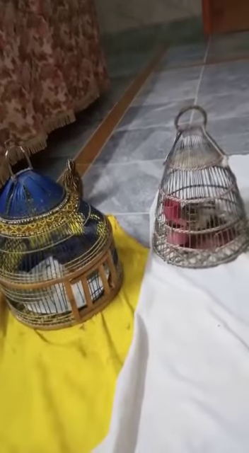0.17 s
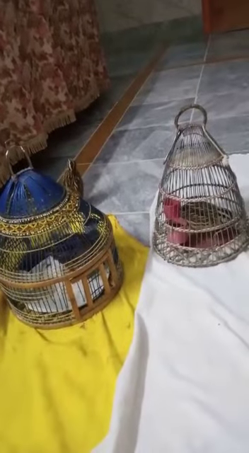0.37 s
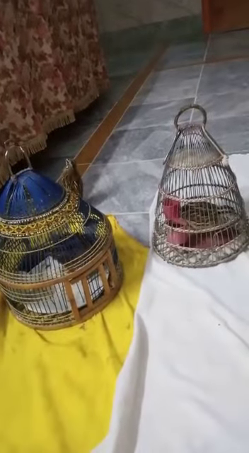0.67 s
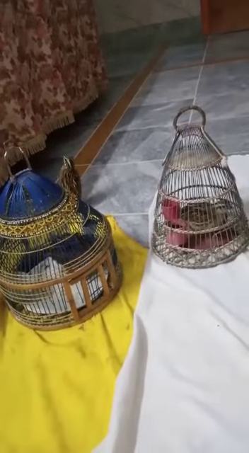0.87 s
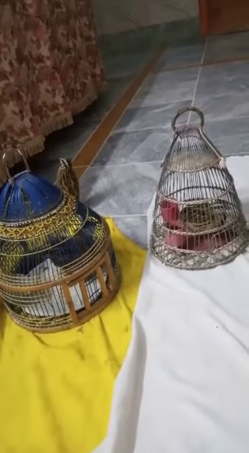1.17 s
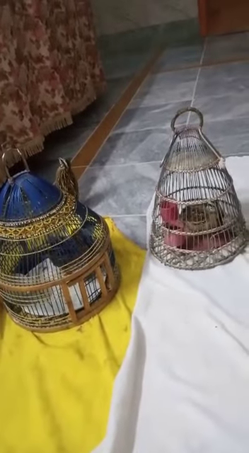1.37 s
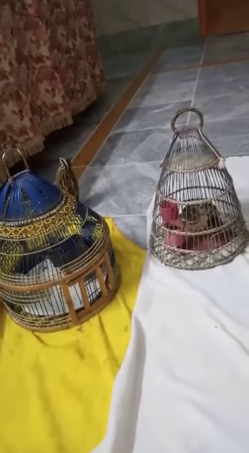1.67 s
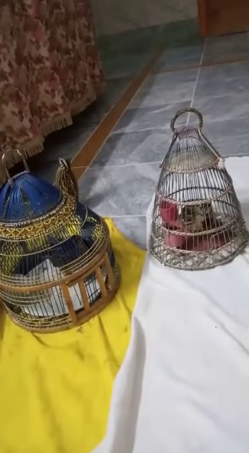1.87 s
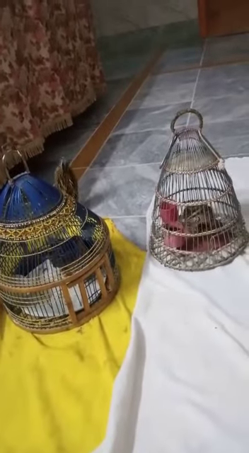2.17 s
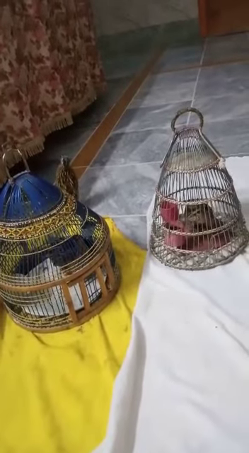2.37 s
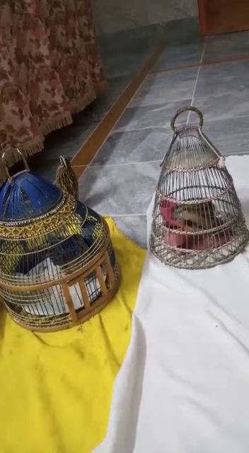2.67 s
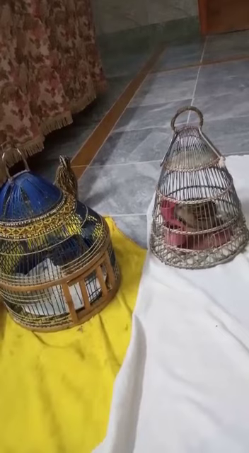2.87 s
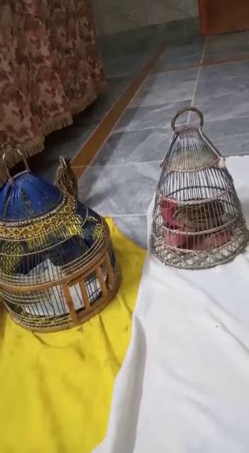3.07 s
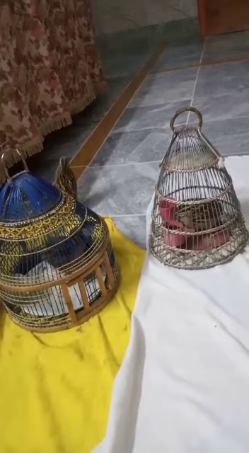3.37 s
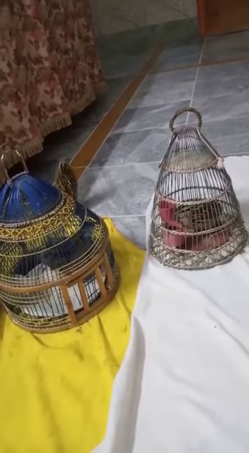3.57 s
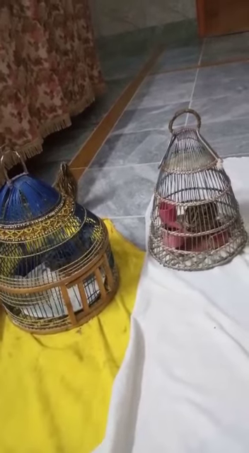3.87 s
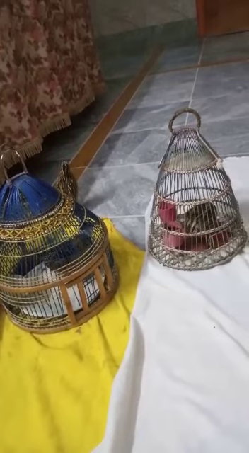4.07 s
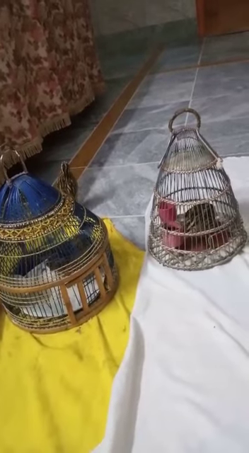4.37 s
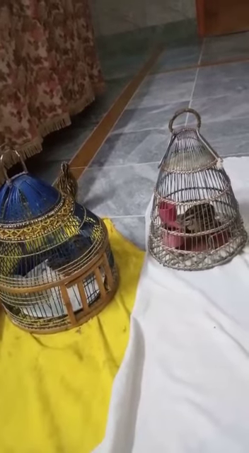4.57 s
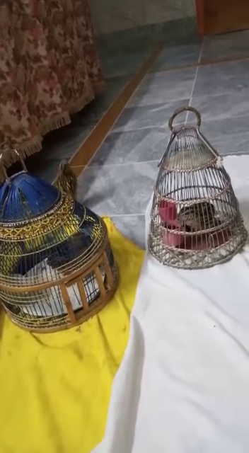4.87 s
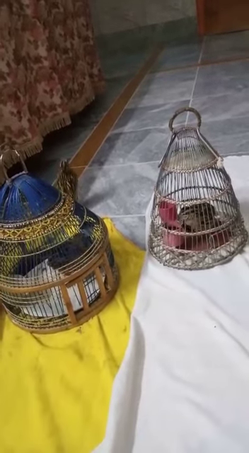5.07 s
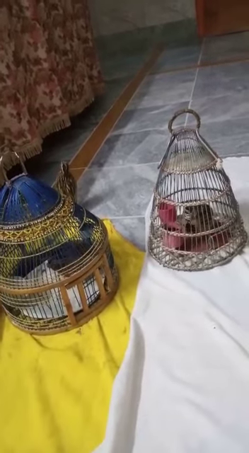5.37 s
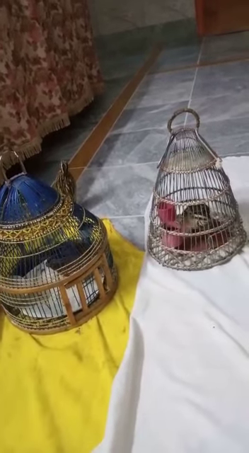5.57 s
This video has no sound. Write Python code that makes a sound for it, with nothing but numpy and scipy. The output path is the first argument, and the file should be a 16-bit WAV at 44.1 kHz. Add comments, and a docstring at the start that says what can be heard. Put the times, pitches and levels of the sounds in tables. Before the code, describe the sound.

A quiet tiled room at home, with a caged quail close to the microphone but facing away. Faint air, low rumble, mains-like hum and a thin, wavering appliance whine near 3.5 kHz lie far beneath. The start may carry the last trace of an earlier call's ring; a tiny peep and soft rustle come at 0.3 s. Sharp, nearly pure whistles follow in pairs: a long note of about a tenth of a second at 0.8 s, a shorter one at 1.1; again at 2.2 and 2.5, 3.6 and 3.9, 5.0 and 5.3. Each drops in, sags around 3.4 kHz, then flicks steeply upward to about 7 kHz. Dense echoes and a bright half-second tail follow. The first pair is a little softer. Slight rustles pass near 1.3, 1.8, 3.3 and 4.3 s; a tiny falling peep leads into the third call. The limiter ducks the background around every call.

```python
"""A caged quail repeats a two-note call in a quiet tiled room: a long sagging whistle, then a short one.
Each note is a near sine with faint overtones, shaped by the throat, and ends in a steep upward flick.
Noise-seeded echoes and a diffuse tail ring on after every flick; tiny gliding peeps come between calls.
Sine tones make an appliance's faint whine and hum; filtered noise makes air, rumble and soft rustles.
The recorder's limiter ducks everything under the calls."""
import sys
import numpy as np
from scipy import signal
from scipy.fft import rfft, irfft, next_fast_len
from scipy.io import wavfile
from scipy.ndimage import uniform_filter1d

SR = 44100
rng = np.random.default_rng(int(sys.argv[2]) if len(sys.argv) > 2 else 0)


def generate_wav(sig):
    """Save sig (samples, or channels by samples) to the path in sys.argv[1] as 16-bit PCM at SR."""
    pcm = np.round(np.clip(np.atleast_2d(sig).T, -1, 1) * 32767).astype(np.int16)
    wavfile.write(sys.argv[1], SR, pcm)


N = 252252
LEAD = SR   # samples of run-in, in which an earlier note still rings
TIME = np.arange(-LEAD, N) / SR   # seconds


def from_db(db):
    """Decibels to gain."""
    return 10 ** (np.asarray(db) / 20)


def rms_one(x):
    """Scale to unit power."""
    return x / np.sqrt(np.mean(x ** 2) + 1e-20)


def fade(share):
    """Smooth ramp from 0 to 1."""
    return np.sin(np.pi / 2 * np.clip(share, 0, 1)) ** 2


def at_hz(points, hz):
    """Read a table on a log-frequency axis."""
    points = np.array(points)
    return np.interp(np.log(np.maximum(hz, 1)), np.log(points[:, 0]), points[:, 1])


def coloured(x, spectrum):
    """Filter by a smooth curve of dB over Hz."""
    size = next_fast_len(len(x))
    gain = from_db(at_hz(spectrum, np.fft.rfftfreq(size, 1 / SR)))
    return irfft(rfft(x, size) * gain, size)[:len(x)]


def noise(spectrum):
    """Unit-power noise of a given colour."""
    return rms_one(coloured(rng.standard_normal(len(TIME)), spectrum))


def drift(rate_hz):
    """Slow random wander with spread 1: noise through two one-pole lowpasses."""
    step, settle = 40, 2000   # samples per drawn value; values dropped while the filter settles
    r = np.exp(-2 * np.pi * step * rate_hz / SR)
    draws = rng.standard_normal(len(TIME) // step + settle + 2)
    slow = signal.lfilter([1], [1, -2 * r, r * r], draws)[settle:]
    return np.interp(np.arange(len(TIME)) / step, np.arange(len(slow)), rms_one(slow))


# Colour of the room air. Each row: frequency in Hz, relative density in dB per Hz.
AIR_COLOUR = [(100, 1), (700, -7), (900, 2), (1200, -1), (3000, -0.5), (4800, 0), (5280, 2.5), (5550, -3),
              (5850, 0), (6600, -7), (7250, 0.5), (7650, -12), (13000, -13), (15500, -8)]
AIR_DB = -73


def room_air():
    """Broad room noise whose level wanders slightly."""
    return noise(AIR_COLOUR) * from_db(AIR_DB + 0.66 * drift(3.7))


# Colour of the distant household rumble. Each row: frequency in Hz, relative density in dB per Hz.
RUMBLE_COLOUR = [(25, -26.5), (60, -1.5), (100, 0), (150, 4.5), (210, -7.5), (320, -13), (550, -14.5),
                 (1000, -21), (2000, -58.5)]
RUMBLE_DB = -69   # before the slow swell


def household_rumble():
    """Low noise whose level wavers."""
    return noise(RUMBLE_COLOUR) * from_db(RUMBLE_DB + 2 * drift(9))


def steady_lines(lines, waver_db, waver_hz):
    """Electrical tones, each a sine wavering a little in level and pitch."""
    out = np.zeros(len(TIME))
    for hz, db in lines:
        level = np.sqrt(2) * from_db(db + waver_db * drift(1.3))   # root 2 turns rms into peak
        pitch = hz + waver_hz * drift(23)
        out += level * np.sin(2 * np.pi * np.cumsum(pitch) / SR)
    return out


# Low tones of the appliance. Each row: pitch in Hz, rms level in dB before the waver and swell.
HUM_LINES = [(100.5, -79.5), (150.7, -71), (301.5, -87)]


def appliance_hum():
    """Low electrical tones, almost steady."""
    return steady_lines(HUM_LINES, waver_db=2.0, waver_hz=1.1)


# High tones of the appliance. Each row: pitch in Hz, rms level in dB before the waver and WHINE_DB.
WHINE_LINES = [(1745, -82), (3435, -84), (3505, -69), (3557, -76), (3607, -81), (5190, -87.5),
               (5399, -80.5), (7165, -94)]
WHINE_DB = -2.5   # trim of all the lines


def appliance_whine():
    """High electrical tones that come and go in level."""
    return from_db(WHINE_DB) * steady_lines(WHINE_LINES, waver_db=6.5, waver_hz=2.6)


SWELL_DB, SWELL_RATE_HZ = 1.06, 0.97


def household_swell():
    """Slow random wander of gain, shared by the hum and rumble."""
    return from_db(SWELL_DB * drift(SWELL_RATE_HZ))


# Faint rustles. Each row: middle in seconds, half length in seconds (the spread of the bell-shaped
# swell), rms level in dB at its height, centre in Hz, width in octaves.
RUSTLE_SWELLS = [(0.305, 0.021, -61.5, 1330, 1.1), (1.298, 0.02, -67.5, 1560, .35),
                 (1.816, 0.039, -76, 650, 1.7), (3.295, 0.041, -67.5, 1160, 1.2),
                 (4.27, 0.06, -74.5, 993, 1.9)]


def rustles():
    """Brief soft swells of noise, each in a band of its own."""
    out = np.zeros(len(TIME))
    for middle, half, level_db, centre_hz, octaves in RUSTLE_SWELLS:
        edges_hz = centre_hz * 2 ** (np.array([-.5, .5]) * octaves)
        band = signal.butter(3, edges_hz, "band", fs=SR, output="sos")
        swell = from_db(level_db) * np.exp(-.5 * ((TIME - middle) / half) ** 2)
        out += swell * rms_one(signal.sosfilt(band, rng.standard_normal(len(TIME))))
    return out


# Ring time of the diffuse tail. Each row: frequency in Hz, time to fall 60 dB in seconds.
TAIL_T60 = [(1000, 0.26), (3500, 0.58), (5300, 0.5), (7200, 0.49), (11000, 0.16), (15000, 0.1)]
TAIL_DB = -18   # energy of the tail against the bird's own sound
EARLY_DB, EARLY_T60 = -1.5, 0.3   # energy of the echoes likewise, and their 60 dB fall in seconds
ECHOES_PER_S = 1500


def room(x, early_build_s, build_s):
    """Strong echoes from floor and near walls, then a weaker diffuse tail that rings longest in mid-treble."""
    t = np.arange(SR) / SR
    fall_60_db = np.log(1000)
    hz, _, frames = signal.stft(rng.standard_normal(SR), SR, nperseg=256)
    ages = np.linspace(0, 1, frames.shape[1])
    decay = np.exp(-fall_60_db * ages / at_hz(TAIL_T60, hz)[:, None])
    tail = signal.istft(frames * decay, SR)[1][:SR]
    tail *= 1 - np.exp(-(t / build_s) ** 2)
    echoes = rng.standard_normal(SR) * (rng.random(SR) < ECHOES_PER_S / SR)
    echoes *= np.exp(-fall_60_db * t / EARLY_T60)
    echoes *= 1 - np.exp(-t / early_build_s)
    response = from_db(TAIL_DB) * tail / np.linalg.norm(tail)
    response += from_db(EARLY_DB) * echoes / np.linalg.norm(echoes)
    return signal.fftconvolve(x, response)[:len(x)]


# The bird faces away, so the flick reaches the walls more strongly than the microphone.
# Each row: frequency in Hz, gain of the direct sound in dB.
DIRECT_COLOUR = [(3000, 0), (3700, 0), (4500, -2), (5600, -1), (7000, 0), (15000, 0)]


def bird_in_room(bird):
    """Direct sound of the turned-away bird plus the room's answer."""
    return coloured(bird, DIRECT_COLOUR) + room(bird, early_build_s=0.0063, build_s=0.023)


# Soft peeps. Each row: start in seconds, length in seconds, first pitch in Hz, last pitch in Hz,
# level in dB at the bird.
PEEP_GLIDES = [(0.293, 0.046, 3602, 3682, -56), (3.562, 0.057, 3830, 3540, -47)]


def peeps(overtone_db):
    """Tiny gliding notes between the calls, a sine and its octave."""
    out = np.zeros(len(TIME))
    for start, length, first_hz, last_hz, level_db in PEEP_GLIDES:
        span = (TIME >= start) & (TIME < start + length)
        pitch = np.linspace(first_hz, last_hz, span.sum())
        phase = 2 * np.pi * np.cumsum(pitch) / SR
        tone = np.sin(phase) + from_db(overtone_db) * np.sin(2 * phase)
        out[span] += from_db(level_db) * signal.windows.tukey(span.sum(), .5) * tone
    return out


# Every note is one gesture, timed back from its end; a short note joins it later
# and so misses the opening sag.
LONG_S, SHORT_S = .106, .079   # note lengths
DIP_LEAD_S = .056   # pitch is lowest about this long before the end of a long note
DIP_LEAD_SHORTENING = .55   # a short note dips earlier by this share of the length it lacks
BEND_HZ_PER_S2 = 150000   # curvature of the pitch around its dip
SCOOP_HZ, SCOOP_S = 500, 0.0018   # the voice drops onto the note from above
FLICK_RISE_HZ = 3873   # the flick grows exponentially up to this height, then holds it
FLICK_GROWTH_S, FLICK_HOLD_S = .0045, .0053


def pitch_rise(left, length):
    """Hz above a note's lowest pitch by the seconds left: a quick drop, a shallow bowl, then the flick."""
    dip = DIP_LEAD_S + DIP_LEAD_SHORTENING * (LONG_S - length)
    bowl = BEND_HZ_PER_S2 * (left - dip) ** 2
    flick = FLICK_RISE_HZ * np.exp((FLICK_HOLD_S - left) / FLICK_GROWTH_S)
    scoop = SCOOP_HZ * np.exp((left - length) / SCOOP_S)
    rise = np.minimum(scoop + bowl + flick, FLICK_RISE_HZ)
    return uniform_filter1d(rise, size=48)   # round the corners over about 1 ms


EFFORT_LEAD_S = 0.045   # effort peaks this long before the end, apart from the flick's extra strength
EFFORT_ARCH_DB_PER_S2 = 4797   # how fast it falls away on both sides
ATTACK_S, RELEASE_S = 0.0091, 0.0063
WAVER_HZ = 8   # spread of the random pitch waver
FLICK_OVERTONE_DB = 11.5   # overtones gain this much per octave of the flick
# Overtones of the syrinx. Each row: multiple of the pitch, level in dB before effort, flick and throat.
SYRINX_OVERTONES = [(2, -24), (3, -24), (4, -42)]
# Throat and beak pass the flick best, with a second peak an octave above the whistle.
# Each row: frequency in Hz for a note whose lowest pitch is THROAT_PITCH_HZ, gain in dB.
THROAT_COLOUR = [(3400, -4.5), (4000, -2.5), (4800, 2.5), (5500, 4.5), (5900, -7.5), (6300, -37.5),
                 (6750, -18.5), (7250, -11), (7520, -17.5), (8500, -30), (10300, -44), (13000, -45),
                 (14600, -26.5), (16000, -36.5)]
THROAT_PITCH_HZ = 3445
# The calls, a long and a short note to each, after a lone short note in the run-in.
# Each row: start in seconds, length in seconds, lowest pitch in Hz (before the waver), level in dB
# (before throat and room), extra strength of the flick in dB per octave.
CALLS = [(-0.45, SHORT_S, 3257, 7, -2.5), (0.802, LONG_S, 3368, 0.5, -1), (1.093, SHORT_S, 3308, 2, -1),
         (2.206, LONG_S, 3417, 5.5, 0), (2.491, SHORT_S, 3349, 5.5, 2.5), (3.605, LONG_S, 3420, 6.5, 0),
         (3.892, SHORT_S, 3379, 6.5, 2), (4.990, LONG_S, 3441, 6.5, 1.5), (5.275, SHORT_S, 3396, 8, -0.5)]


def whistles(brightening):
    """The syrinx gives a near sine that follows the same gesture in every note; effort adds overtones."""
    out, waver = np.zeros(len(TIME)), WAVER_HZ * drift(73)
    for start, length, lowest_hz, level_db, flick_db in CALLS:
        span = (TIME >= start) & (TIME < start + length)
        age = TIME[span] - start
        left = length - age
        pitch = lowest_hz + pitch_rise(left, length) + waver[span]
        phase = 2 * np.pi * np.cumsum(pitch) / SR
        octaves_up = np.log2(pitch / lowest_hz)
        arch_db = EFFORT_ARCH_DB_PER_S2 * (left - EFFORT_LEAD_S) ** 2
        effort_db = level_db - arch_db + flick_db * octaves_up
        edge_db = brightening * effort_db + FLICK_OVERTONE_DB * octaves_up
        in_throat = pitch * THROAT_PITCH_HZ / lowest_hz   # the throat tightens with the pitch of the note
        tone = from_db(at_hz(THROAT_COLOUR, in_throat)) * np.sin(phase)
        for k, db in SYRINX_OVERTONES:
            gain = from_db(db + edge_db + at_hz(THROAT_COLOUR, k * in_throat))
            tone += gain * np.sin(k * phase) * (k * pitch < SR / 2)   # silent where it would alias
        out[span] += tone * from_db(effort_db) * fade(age / ATTACK_S) * fade(left / RELEASE_S)
    return out


def limiter(x, ceiling_db, release_db_per_s):
    """Every 20 ms the gain steps down to fit the coming peak, holds for one more step, then climbs back."""
    block = SR // 50
    peaks = np.abs(np.pad(x, (0, -len(x) % block))).reshape(-1, block).max(axis=1)
    held = np.maximum(peaks, np.roll(peaks, 1))
    over_db = np.maximum(20 * np.log10(held + 1e-9) - ceiling_db, 0)
    excess_db = np.repeat(over_db, block)[:len(x)]
    release_db = release_db_per_s * TIME
    cut_db = np.maximum.accumulate(excess_db + release_db) - release_db
    return x * from_db(-uniform_filter1d(cut_db, size=80))   # each step is a short ramp


def scene():
    """The bird in its room, over the household floor."""
    background = room_air() + appliance_whine() + rustles()
    background += household_swell() * (appliance_hum() + household_rumble())
    bird = whistles(brightening=0.96) + peeps(overtone_db=-20.5)
    return (background + bird_in_room(bird))[None, LEAD:]


CUTOFF_HZ = 15900


def record(dry):
    """The limiter holds the calls level; a steep lowpass cuts the top."""
    held = limiter(np.pad(dry[0], (LEAD, 0)), ceiling_db=-5.0, release_db_per_s=129.5)[LEAD:]
    lowpass = signal.cheby1(12, .3, CUTOFF_HZ, fs=SR, output="sos")
    return signal.sosfilt(lowpass, held)[None]


dry = scene()
out = record(dry)
generate_wav(out)
```